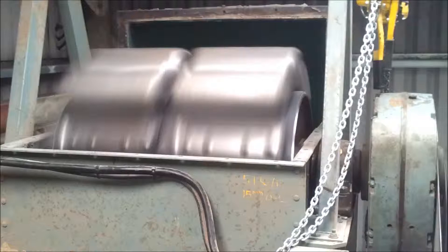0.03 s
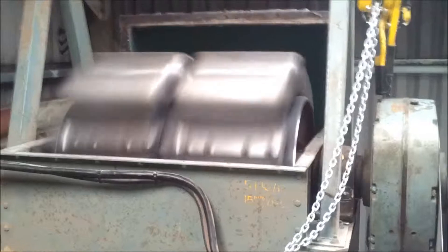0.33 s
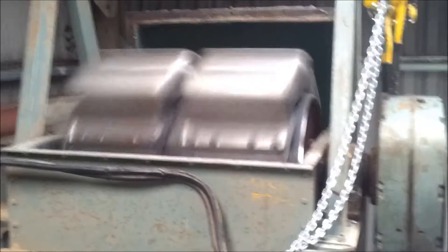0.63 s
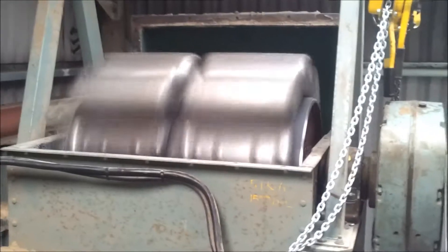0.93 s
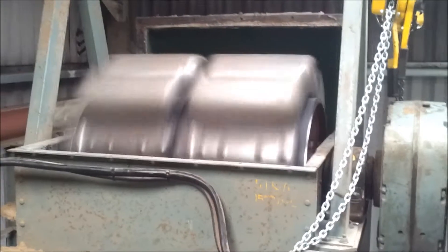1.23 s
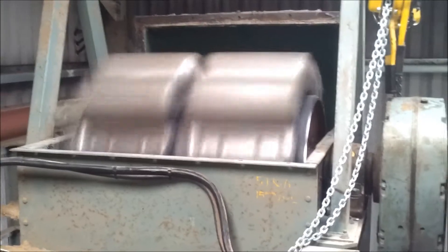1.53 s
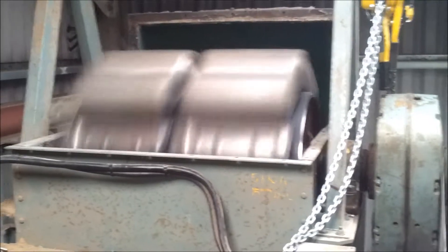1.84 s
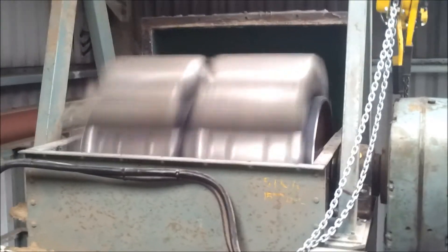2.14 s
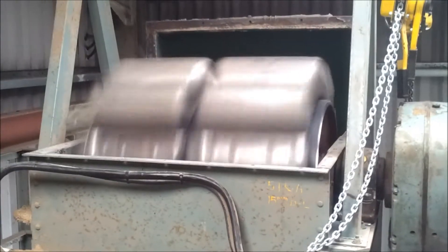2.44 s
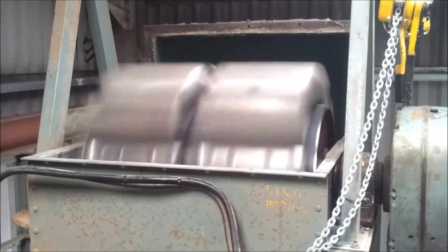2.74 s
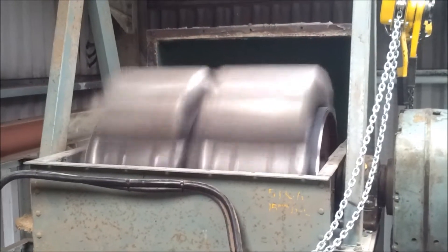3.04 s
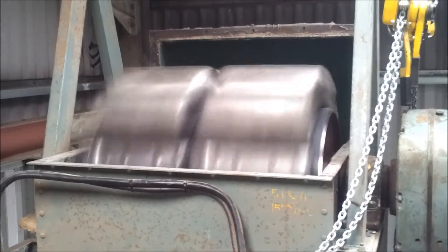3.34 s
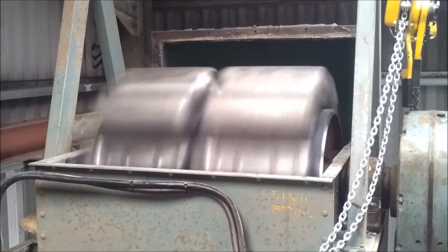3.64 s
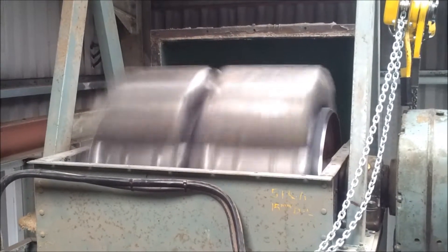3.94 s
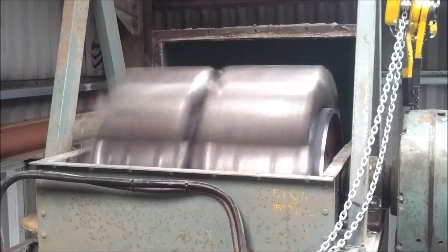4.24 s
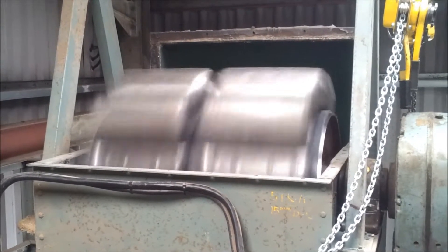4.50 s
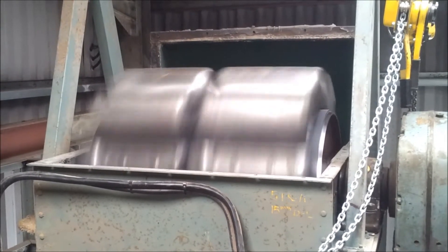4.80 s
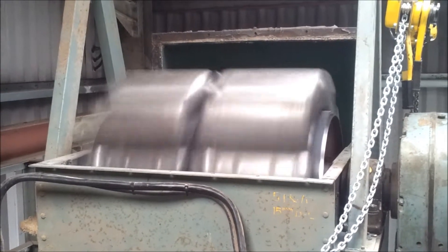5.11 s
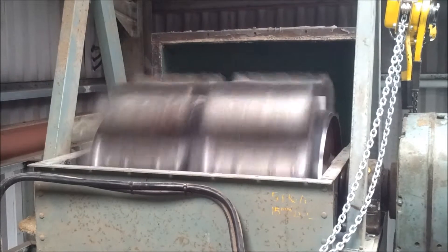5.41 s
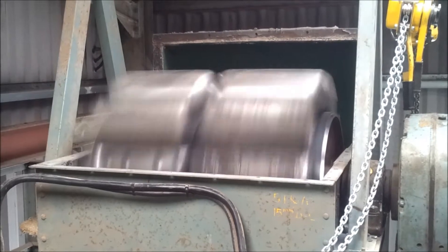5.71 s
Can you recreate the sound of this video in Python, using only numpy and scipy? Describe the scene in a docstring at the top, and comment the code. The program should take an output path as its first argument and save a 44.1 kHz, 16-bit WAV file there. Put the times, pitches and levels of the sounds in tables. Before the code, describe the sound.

Steady electric hum and machine roar from a spinning elevator drum, with hissing grain, a faint whine and occasional small clinks.

```python
"""A grain elevator's head drum and drive, running steadily in a steel building, close to a two-port mic.
The electric drive hums on the sixth multiple of the mains and whines faintly; belt and drum roar in
their casing. Grain hisses on the sheet metal in uneven surges, and the steel's ring throbs with the
drive shaft. Now and then a lump clinks, stray grain sprays, or the belt clatters or knocks.
The mic's right port faces away from the grain and sounds quieter and duller."""
import sys
import numpy as np
from scipy import signal
from scipy.fft import rfft, irfft
from scipy.io import wavfile

SR = 44100
rng = np.random.default_rng(int(sys.argv[2]) if len(sys.argv) > 2 else 0)


def materialize(psi):
    """Save the field psi as 16-bit PCM at rate SR to the path in sys.argv[1].

    A 1-D psi becomes a single channel; in a 2-D psi each row is a channel.
    """
    bounded = np.clip(np.atleast_2d(psi).T, -1, 1)
    quanta = np.round(bounded * 32767).astype(np.int16)
    wavfile.write(sys.argv[1], SR, quanta)


N = 262836
T = np.arange(N) / SR
FREQ = np.arange(N // 2 + 1) * SR / N + 1e-6
MAINS_HZ, SHAFT_HZ = 50.01, 24.98

# The drive's hum, strongest line first. Each row: multiple of the mains, level in dB,
# right port against left in dB, right port's lag in radians.
MAINS_HUM = [(6, -9.5, -8.5, 2.62), (12, -30.5, -4, 3.25), (22, -40, -9, 5.4), (23, -52.5, 15.5, 3),
             (24, -42, -1.5, 4.8)]
# The running gear's low drone. Each row: pitch in Hz, level in dB.
GEAR_DRONE = [(155, -44.5), (174.5, -39), (199.5, -34.5), (221.5, -38.5), (250, -38.5), (265, -39.5),
              (325, -38), (398, -40)]
# The drive's whine. Each row: pitch in Hz, level in dB, right port against left in dB, its lag in radians.
DRIVE_WHINE = [(2322, -47, -3.5, 4.0), (3996, -54.5, -9, 1.3), (5994, -44.3, -17, 0), (6094, -53.5, -17, 0),
               (6993, -54, -18, 1.5)]
# Belt and drum roaring in the casing. Each row: frequency in Hz, level in dB per Hz.
CASING_ROAR = [(25, -73), (60, -72.5), (110, -58), (155, -48), (220, -46), (330, -44), (450, -46.5),
               (580, -47.5), (780, -50.5), (1050, -52.5), (1280, -54), (1680, -56), (2000, -60.5),
               (2400, -61.5), (3600, -85.5)]
# Swell of the roar's low end. Each row: time in seconds, gain in dB.
RUMBLE_SWELL = [(.2, 1.5), (1.1, 0), (3.15, 1), (3.4, -2), (3.65, 0), (4.8, 0), (5.2, 1.5), (5.9, 4)]
# The casing's panel modes. Each row: pitch in Hz, width in Hz, lift in dB.
PANEL_MODES = [(173, 10, -2), (206.3, 4.6, 4), (585, 31, 1.5), (700, 20, 1.5), (980, 100, 3),
               (1136, 14, 4.5), (1335, 49, 2), (1590, 70, 2), (1686, 56, 5), (1778, 45, 4), (2100, 130, 1),
               (2400, 140, 1.3)]
# Grain striking steel. Each row: frequency in Hz, level in dB per Hz.
GRAIN_HISS = [(800, -106), (2800, -66.5), (3600, -64), (4900, -67.5), (5450, -71), (6400, -69), (7600, -65),
              (8400, -68.8), (9100, -68.5), (11200, -70.4), (12800, -77.5), (14000, -100)]
# The struck steel's modes. Each row: pitch in Hz, width in Hz, peak level in dB per Hz.
STEEL_MODES = [(2670, 70, -68), (3470, 110, -71), (3660, 60, -69), (3770, 40, -66.5), (3860, 40, -69),
               (4800, 45, -68), (4940, 70, -67.5), (5880, 40, -72), (6010, 50, -67), (6110, 70, -70),
               (6820, 30, -61), (6990, 60, -64.5), (7205, 60, -60.5), (7355, 90, -57.5), (7740, 110, -65.5),
               (7970, 80, -65), (8540, 60, -67.5), (8672, 35, -64), (10005, 50, -68), (11250, 200, -74.5)]
# Surges in the grain's hiss and ring. Each row: time in seconds, gain in dB.
GRAIN_FLOW = [(0.25, -0.5), (0.36, -1), (0.87, 0), (0.99, -0.5), (1.08, 0.7), (1.3, -1.2), (1.67, 1),
              (1.79, -0.8), (2.41, 0), (2.65, -0.5), (2.81, -0.2), (2.89, -1.5), (3.23, -0.5), (3.46, 0.6),
              (3.62, -0.9), (3.76, 1), (3.96, 0.3), (4.23, -0.5), (4.51, -0.1), (4.6, -2.3), (4.69, -0.5),
              (4.99, 1), (5.13, -1.1), (5.41, 0), (5.51, -0.5), (5.91, 0.9)]
# The hood's modes. Each row: pitch in Hz, width in Hz, relative level in dB.
HOOD_MODES = [(2240, 90, -3), (2400, 80, 0), (2650, 80, -2), (3020, 90, -2), (3380, 100, 1),
              (3870, 110, -1), (4300, 110, -3), (4570, 130, -3), (4980, 140, -3)]
# Lumps on the hood. Each row: start in seconds, level in dB, brightest pitch in Hz,
# spread in octaves, seconds to fall 60 dB.
LUMP_CLINKS = [(.655, -24, 3200, .3, .14), (.668, -26, 4300, .16, .12), (.938, -16, 3400, .25, .09),
               (1.168, -24, 2550, .2, .1), (2.549, -19, 2520, .16, .12), (2.556, -27.5, 5000, .14, .18),
               (4.677, -23, 4570, .07, .09)]
# Stray grain on the hood. Each row: start in seconds, level in dB, centre in Hz, width in Hz,
# seconds to fall 60 dB.
GRAIN_SPRAYS = [(.855, -32, 10500, 3500, .25), (2.061, -24.5, 8700, 900, .08),
                (3.371, -25.3, 11200, 4500, 0.22), (3.415, -25, 10900, 3500, 0.2),
                (3.468, -23, 7400, 400, .1), (3.702, -27, 8400, 600, .07), (3.745, -28, 8500, 5000, .12),
                (4.222, -22, 8620, 700, 0.066), (4.645, -30.5, 11600, 2500, .2),
                (4.666, -26, 8550, 900, .08)]
# The belt clattering in the casing. Each row: start in seconds, level in dB, centre in Hz,
# width in Hz, seconds to fall 60 dB.
BELT_CLATTERS = [(3.045, -20.5, 1100, 1200, 0.28), (3.605, -18, 1550, 700, 0.11),
                 (5.02, -21, 2200, 3000, 0.074)]
# A soft knock of the belt and its rebounds. Each row: time in seconds, peak level in dB, pitch in Hz.
BELT_KNOCKS = [(5.015, -6, 195), (5.022, -17, 135), (5.031, -13.5, 225)]
# Shade on the mic's right port. Each row: frequency in Hz, level against the left in dB.
PORT_SHADE = [(60, -11), (200, -8), (370, -5), (650, -3), (1300, -3.5), (2300, -4), (3700, -7),
              (4800, -12.5), (6400, -15.5), (7400, -22.5), (9500, -25.5), (13000, -39)]
# How alike the two ports sound. Each row: frequency in Hz, correlation from 0 to 1.
PORT_LIKENESS = [(40, 0.8), (130, 1), (280, 0.9), (600, 0.79), (1000, 0.53), (1400, 0.36), (3000, 0.17)]
# The right port trails the left. Each row: frequency in Hz, lag in radians.
PORT_LAG = [(100, 2.8), (330, 2.7), (800, 2.9), (1100, 3.3), (1300, 4), (1700, 3.3), (2200, 4), (2700, 3.6)]


def undb(db):
    """Decibels to gain."""
    return 10 ** (np.asarray(db) / 20)


def across(table):
    """Rows of (Hz, value) joined on a log-frequency axis."""
    hz, value = np.transpose(table)
    return np.interp(np.log(FREQ), np.log(np.sort(hz)), value)


def colour(table):
    """Response that gives unit white noise the tabled dB per Hz."""
    return undb(across(table)) * np.sqrt(SR / 2)


def resonance(hz, width_hz):
    """Response of one damped mode, gain 1 at the centre."""
    return 1 / (1 + 1j * (FREQ ** 2 - hz ** 2) / (FREQ * width_hz))


def wander(rate_hz):
    """Smooth random drift up to about rate_hz, with a spread of 1."""
    drift = irfft(rfft(rng.standard_normal(N)) / (1 + (FREQ / rate_hz) ** 4), N)
    return (drift - drift.mean()) / drift.std()


def rise_and_decay(start_s, rise_s, t60):
    """Envelope that rises quickly and dies away by 60 dB every t60 seconds."""
    age = np.maximum(T - start_s, 0)
    return (1 - np.exp(-age / rise_s)) * np.exp(-np.log(1000) * age / t60)


def mic_ports(direct, diffuse):
    """Two spectra to stereo: the right port is shaded, nearly opposed in the bass, unlike in the treble."""
    likeness = np.clip(across(PORT_LIKENESS), 0, 1)
    right = likeness * np.exp(-1j * across(PORT_LAG)) * direct + np.sqrt(1 - likeness ** 2) * diffuse
    return irfft(np.array([direct, right * undb(across(PORT_SHADE))]), N)


def drive_tone(hz, db, right_db, lag_rad, waver_db, waver_rad, rate_hz=3):
    """One line of the drive at both ports, wavering in level and phase."""
    phase = 2 * np.pi * hz * T + waver_rad * wander(rate_hz)
    amplitude = np.sqrt(2) * undb(db + waver_db * wander(rate_hz))
    return amplitude * np.array([np.sin(phase), undb(right_db) * np.sin(phase - lag_rad)])


def drive(flutter_hz=17.9, flutter_db=0.62):
    """The three-phase supply's fluttering hum, with a low drone, unsteady overtones and a thin whine."""
    (multiple, *at_mic), *overtones = MAINS_HUM
    hum = drive_tone(multiple * MAINS_HZ, *at_mic, waver_db=0.36, waver_rad=0.03, rate_hz=5)
    flutter = undb(flutter_db * np.sin(2 * np.pi * flutter_hz * T + 0.5 * wander(1.1)))
    drone = sum(drive_tone(hz, db, right_db=-9, lag_rad=3.1, waver_db=2.5, waver_rad=0.35)
                for hz, db in GEAR_DRONE)
    buzz = sum(drive_tone(multiple * MAINS_HZ, *at_mic, waver_db=1.5, waver_rad=1, rate_hz=3.3)
               for multiple, *at_mic in overtones)
    whine = sum(drive_tone(*row, waver_db=2.4, waver_rad=0.6, rate_hz=16) for row in DRIVE_WHINE)
    return hum * flutter + drone + buzz + whine


def steel_building(wet_db=-13, t60=0.25):
    """The room from close up: the direct path plus weaker, dense reflections, at unit power."""
    tail = rng.standard_normal(N) * np.exp(-np.log(1000) * T / t60)
    return (1 + undb(wet_db) * rfft(tail / np.linalg.norm(tail))) / np.hypot(1, undb(wet_db))


def belt_and_drum(flutter_db=0.5, rattle_db=0.27, rumble_hz=230):
    """Belt and drum shake the casing panels; the load flutters, the cups rattle, the rumble swells."""
    shake = undb(flutter_db * wander(7.3) + rattle_db * wander(70)) * rng.standard_normal((2, N))
    rumble = irfft(rfft(shake) / (1 + (FREQ / rumble_hz) ** 8), N)
    swell = undb(np.interp(T, *np.transpose(RUMBLE_SWELL)))
    shake = shake + rumble * (swell - 1)
    panels = 1 + sum((undb(lift_db) - 1) * resonance(hz, width) for hz, width, lift_db in PANEL_MODES)
    return mic_ports(*rfft(shake) * colour(CASING_ROAR) * panels * steel_building())


def kernels(per_second, scatter_db):
    """Two streams of tiny impacts of scattered size, at unit power."""
    hits = rng.random((2, N)) < per_second / SR
    impacts = hits * rng.choice([-1, 1], (2, N)) * undb(scatter_db * rng.standard_normal((2, N)))
    return impacts / impacts.std()


def grain_stream(gush_db=0.62, gush_hz=18, throb_db=1.55, flicker_db=1.8):
    """Kernels pelt the steel in surges and quick gushes; its ring throbs once a turn of the shaft."""
    flow_db = np.interp(T, *np.transpose(GRAIN_FLOW)) + gush_db * wander(gush_hz)
    hiss = rfft(kernels(per_second=16000, scatter_db=1.5) * undb(flow_db)) * colour(GRAIN_HISS)
    ring_gain = undb(flow_db + flicker_db * wander(41) - throb_db * np.sin(2 * np.pi * SHAFT_HZ * T))
    ring = 0
    for hz, width, peak_db in STEEL_MODES:
        pelting = rfft(kernels(per_second=3000, scatter_db=2.5) * ring_gain)
        ring += pelting * undb(peak_db) * resonance(hz, width)
    return mic_ports(*(hiss + ring * np.sqrt(SR / 2)))


def lump_clink(start_s, db, bright_hz, octaves, t60, rise_s=0.0055, strike_db=-7):
    """A lump strikes the hood and skitters on, ringing most of all the modes near bright_hz."""
    skitter = rise_and_decay(start_s, rise_s, t60)
    impulse = np.diff(T > start_s + rise_s, prepend=False)
    strike = impulse * np.linalg.norm(skitter) * undb(strike_db)  # set against the whole skitter
    contact = rfft(strike + skitter * rng.standard_normal((2, N))) / np.hypot(1, undb(strike_db))
    hood = sum(undb(mode_db) * resonance(hz, width) / np.hypot(1, np.log2(hz / bright_hz) / octaves)
               for hz, width, mode_db in HOOD_MODES)
    hood /= np.sqrt(np.mean(np.abs(hood) ** 2))
    return mic_ports(*(contact * hood * undb(db)))


def sheet_metal_burst(start_s, db, hz, width_hz, t60, rise_s=0.005):
    """Stray grain or the clattering belt rings one band of the sheet metal in a quick scatter of hits."""
    band = irfft(rfft(rng.standard_normal((2, N))) * resonance(hz, width_hz) ** 2, N)
    return mic_ports(*rfft(band / band.std() * rise_and_decay(start_s, rise_s, t60) * undb(db)))


def belt_knock(time_s, db, hz, width_hz=75, push_s=0.0045, low_cut_hz=115):
    """One soft blow of the belt on the casing: a few low, damped cycles; the panel gives no deep bass."""
    push = np.exp(-((T - time_s) * 8 / push_s) ** 2)
    radiated = 1 / (1 + (low_cut_hz / FREQ) ** 6)
    thud = irfft(rfft(push) * resonance(hz, width_hz) ** 2 * radiated, N)
    return mic_ports(rfft(undb(db) * thud / np.abs(thud).max()), diffuse=0)


def scene():
    """Close by the elevator head: drive, belt and grain throughout, with brief sounds on top."""
    bursts = sum(sheet_metal_burst(*row) for row in GRAIN_SPRAYS + BELT_CLATTERS)
    clinks = sum(lump_clink(*row) for row in LUMP_CLINKS)
    knocks = sum(belt_knock(*row) for row in BELT_KNOCKS)
    return drive() + belt_and_drum() + grain_stream() + clinks + bursts + knocks


def record(dry, start_s=0.166, fade_s=0.015, ceiling=0.94, top_hz=13900):
    """After a moment's silence the recorder fades in quickly, clips the tallest peaks and cuts the top."""
    fade = 1 - np.exp(-np.maximum(T - start_s, 0) / fade_s)
    low_pass = signal.ellip(10, 0.1, 80, top_hz, fs=SR, output="sos")
    return signal.sosfilt(low_pass, np.clip(dry * fade, -ceiling, ceiling))


dry = scene()
out = record(dry)
materialize(out)
```